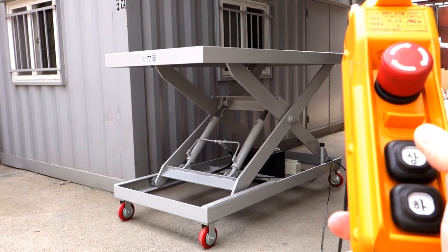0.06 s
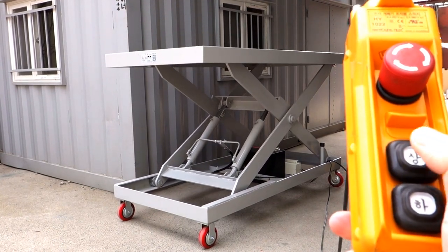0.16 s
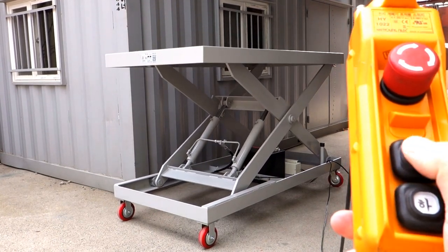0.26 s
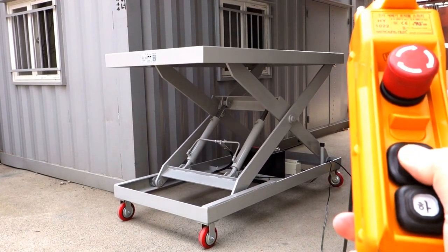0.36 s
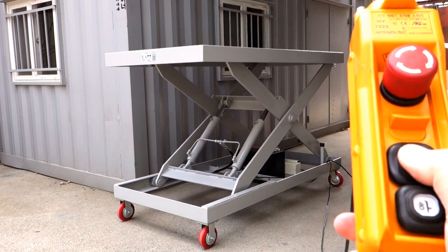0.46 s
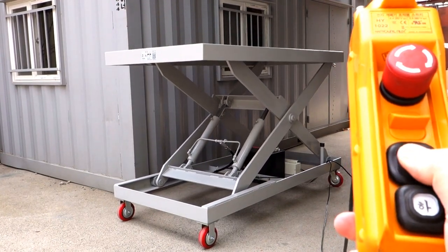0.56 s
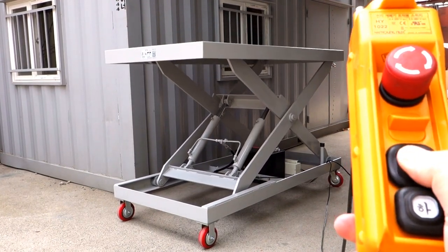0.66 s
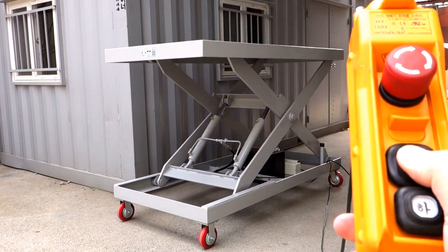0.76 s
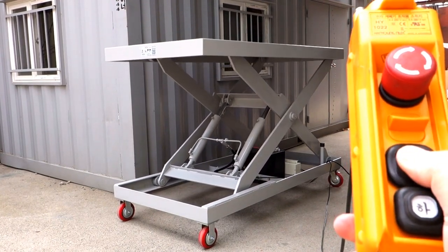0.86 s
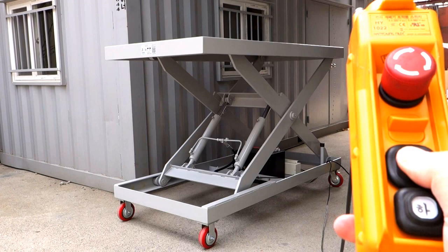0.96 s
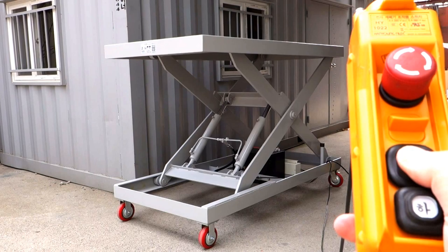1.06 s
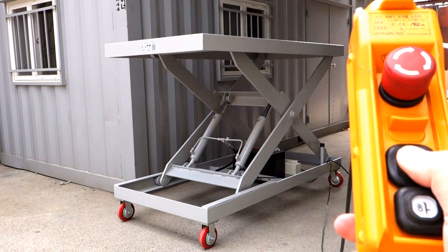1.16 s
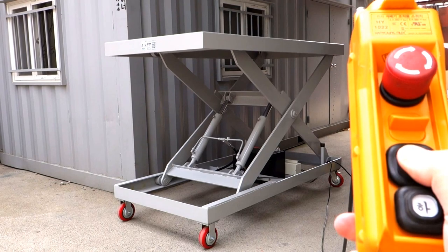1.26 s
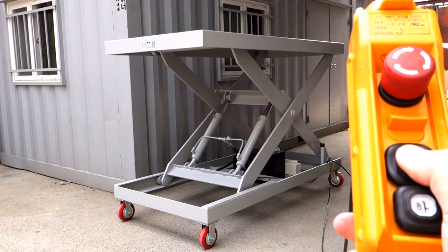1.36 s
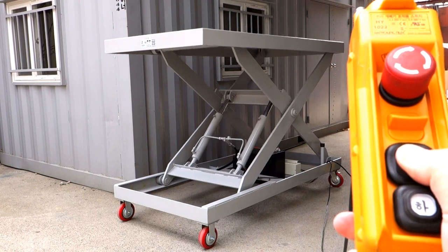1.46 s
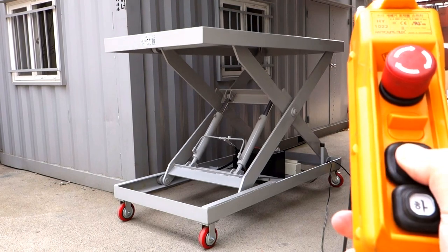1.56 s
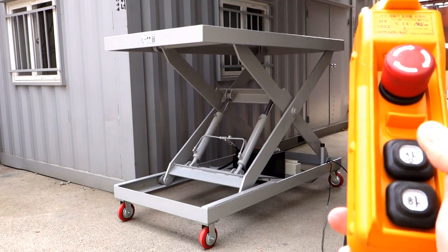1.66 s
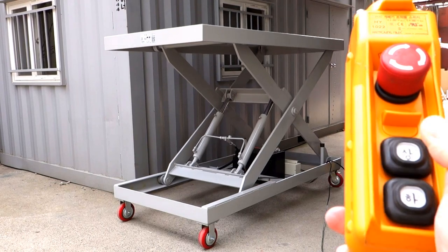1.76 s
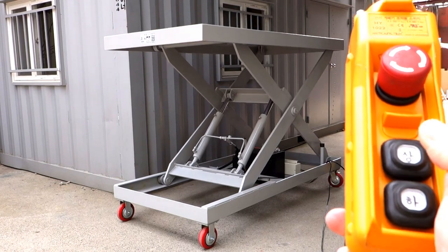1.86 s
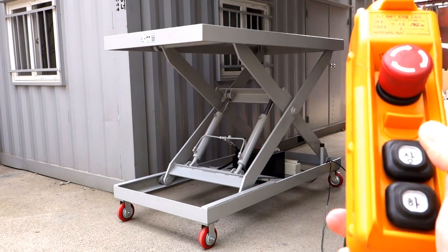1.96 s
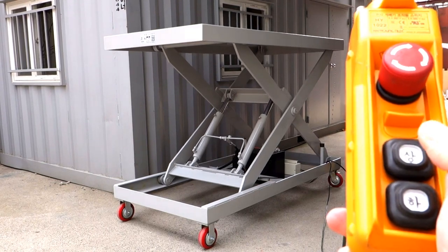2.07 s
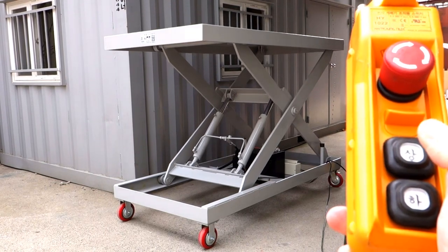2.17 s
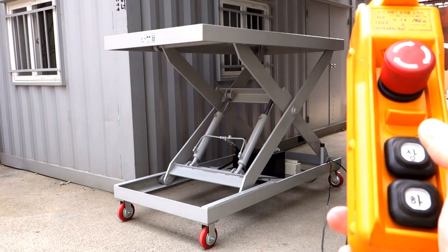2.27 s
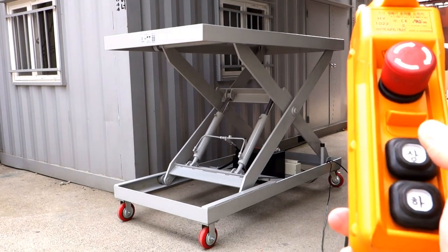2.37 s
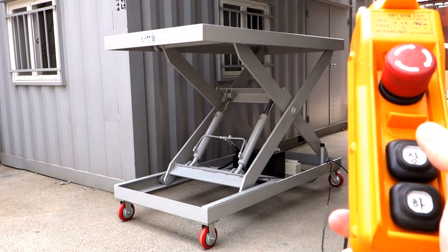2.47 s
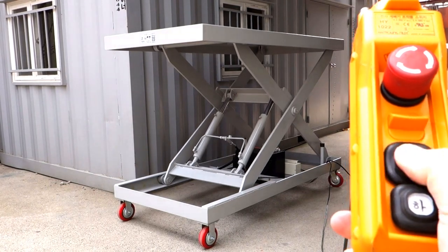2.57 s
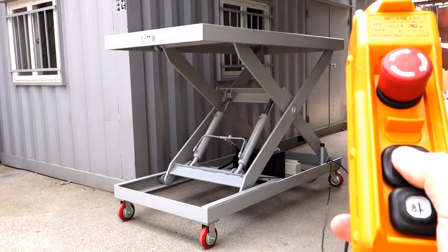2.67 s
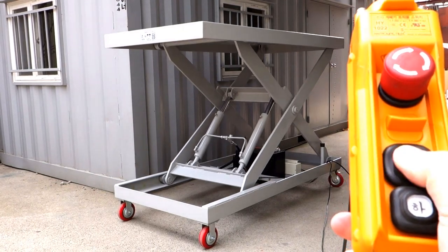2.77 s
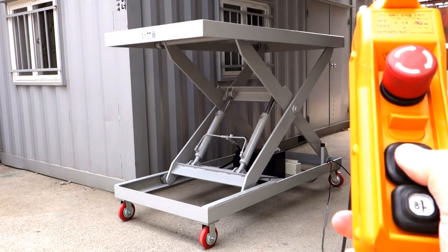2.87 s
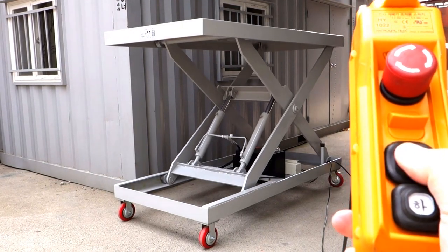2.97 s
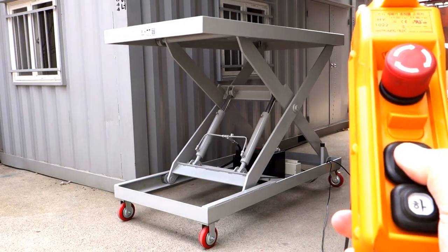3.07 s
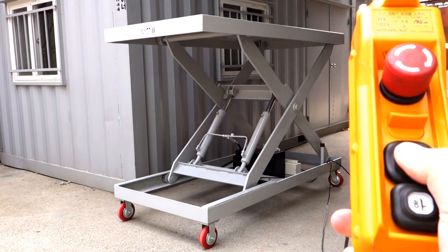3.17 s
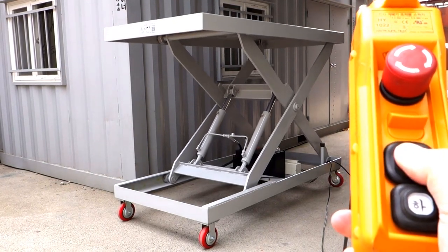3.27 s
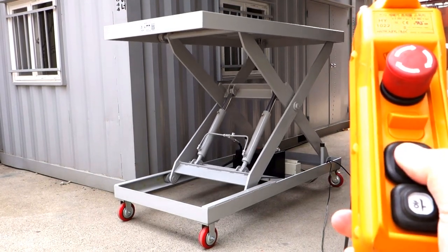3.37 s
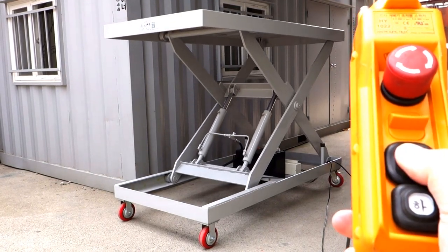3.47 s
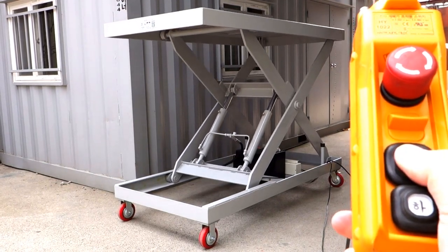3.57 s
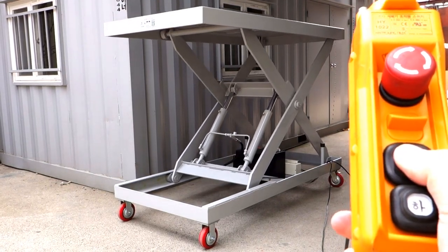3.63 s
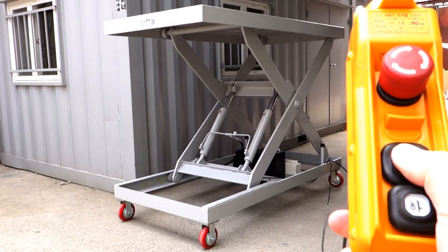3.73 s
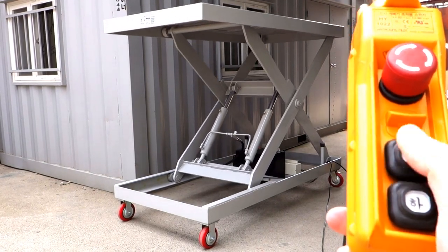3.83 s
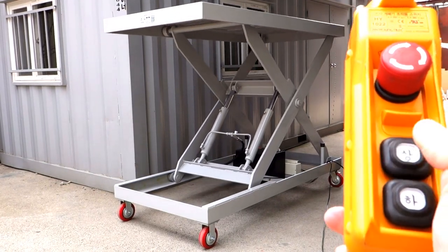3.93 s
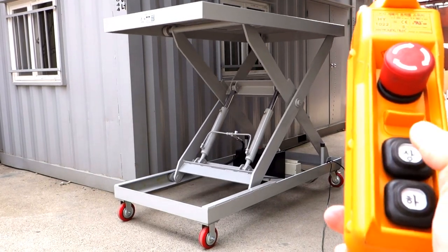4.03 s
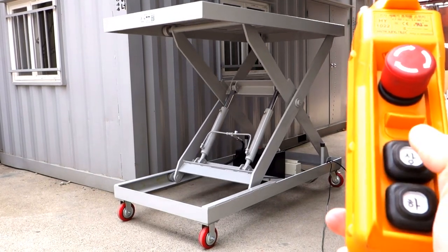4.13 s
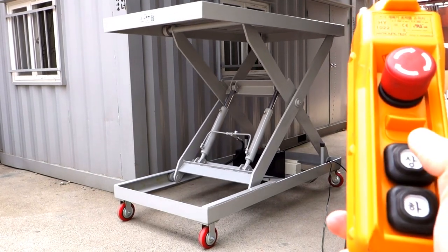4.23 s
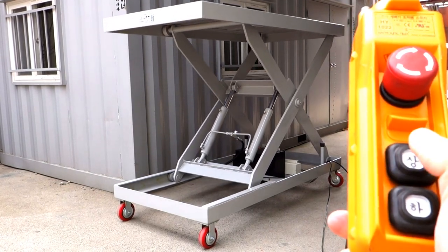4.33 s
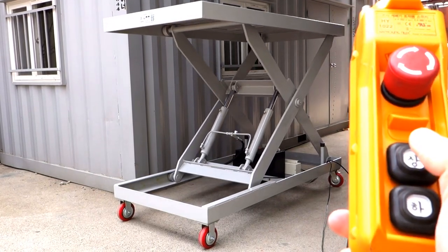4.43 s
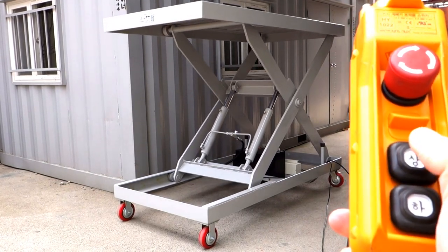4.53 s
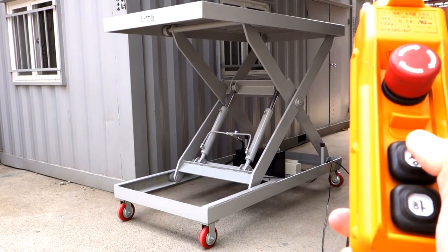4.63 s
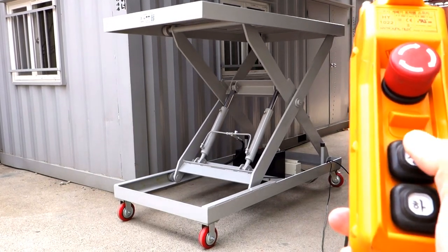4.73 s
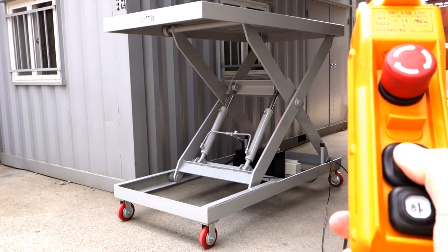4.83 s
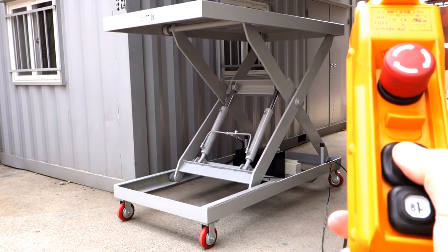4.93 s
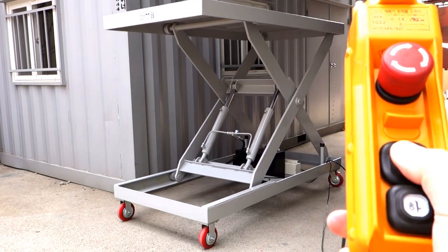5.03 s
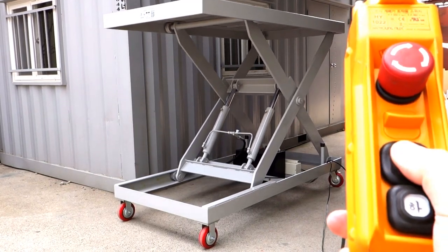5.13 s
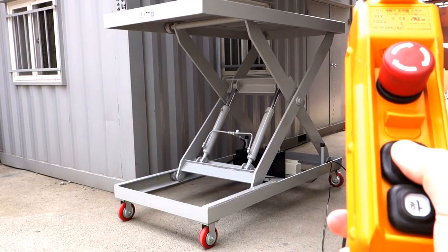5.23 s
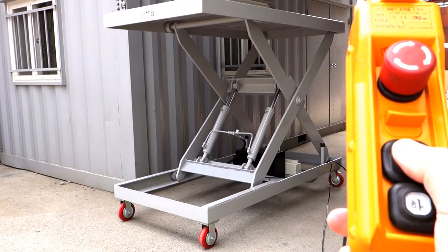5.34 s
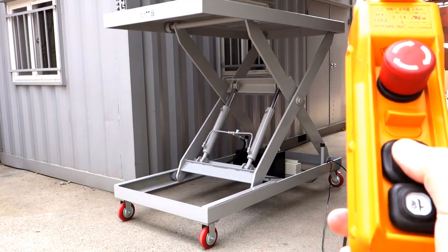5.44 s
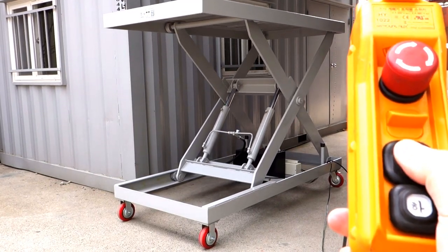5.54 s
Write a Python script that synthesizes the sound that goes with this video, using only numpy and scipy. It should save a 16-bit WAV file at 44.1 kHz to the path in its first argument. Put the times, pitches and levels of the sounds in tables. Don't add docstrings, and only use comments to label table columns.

```python
import sys
import numpy as np
from scipy import signal
from scipy.fft import rfft, irfft, next_fast_len
from scipy.io import wavfile
from scipy.ndimage import uniform_filter1d

SR = 44100
rng = np.random.default_rng(int(sys.argv[2]) if len(sys.argv) > 2 else 0)


def persist_wave(psi):
    counts = np.round(np.clip(psi, -1, 1) * 32767).astype(np.int16)
    wavfile.write(sys.argv[1], SR, np.atleast_2d(counts).T)


def linear_from_db(decibels):
    return 10 ** (np.asarray(decibels, float) / 20)


N = 246959
T = np.arange(N) / SR

SHAFT_HZ, TEETH, MAINS_HZ = 29.7225, 9, 60.0
# frequency in Hz, level in dB per Hz.
OIL_SPECTRUM = [(530, -59), (900, 0.5), (1150, -21.5), (1510, -5), (1600, -16), (2040, -12.5), (2660, -8.5),
                (2890, -11), (4300, -19.5), (5450, -25), (6000, -20.5), (10400, -16.5), (12600, -23),
                (14700, -26), (15400, -35), (16000, -52)]


def evened(x):
    return x / np.sqrt(np.mean(x ** 2) + 1e-20)


def read(points, hz):
    f, value = np.transpose(points)
    return np.interp(np.log(hz + 1), np.log(f + 1), value)


def fade(points):
    return linear_from_db(np.interp(T, *np.transpose(points)))


def colour(x, points):
    log_gain = np.log(linear_from_db(np.maximum(read(points, abs(np.fft.fftfreq(4096, 1 / SR))), -100)))
    taps = np.fft.ifft(np.exp(np.conj(signal.hilbert(log_gain)))).real[:2048]
    return signal.oaconvolve(x, taps)[:len(x)]


def ring(x, modes):
    out = np.zeros(len(x))
    for hz, width, db in modes:
        r = np.exp(-np.pi * width / SR)
        pole = r * np.exp(2j * np.pi * hz / SR)
        out += linear_from_db(db) * 2 * signal.lfilter([1 - r], [1, -pole], x).real
    return out


def drift(hz):
    t = T[::128]
    waves = [np.sin(2 * np.pi * (f * t + rng.random())) / np.sqrt(f) for f in np.geomspace(hz / 10, hz, 12)]
    return np.interp(T, t, evened(sum(waves)))


def tone(cycles):
    return np.cos(2 * np.pi * cycles)


def ports(x, side, lag, spread_s):
    # frequency in Hz, likeness from 0 to 1.
    likeness = [(100, 1), (300, 0.98), (640, 0.95), (1400, 0.75), (3100, 0.49), (5200, 0.08), (7000, 0.29),
                (15000, 0.36)]
    size = next_fast_len(N + SR // 2)
    hz = np.fft.rfftfreq(size, 1 / SR)
    hops = np.exp(-2j * np.pi * hz * spread_s * rng.uniform(.2, 1, (6, 1)))
    near = np.prod((hops - .5) / (1 - .5 * hops), 0)
    same = np.clip(read(likeness, hz), 0, 1)
    short = np.minimum(hz / 350, 1)
    mid = np.sqrt((1 + same) / 2)
    rest = np.sqrt((1 - same) / 2) * near * short
    lag_hz = lag / (1 + (hz / 6300) ** 6)
    tilt = linear_from_db(read(side, hz) / 2 * short) * np.exp(-1j * np.pi * hz * lag_hz / SR)
    pair = np.array([(mid + rest) * tilt, (mid - rest) / tilt])
    return irfft(rfft(x, size) * pair, size)[:, :N]


def far_wash():
    # frequency in Hz, level in dB per Hz.
    spectrum = [(18, -38), (32, -10), (60, -1.5), (119, -15), (162, -9), (265, -10.5), (450, -15.5),
                (800, -20), (1500, -25), (2500, -31.5), (4000, -40.5), (6500, -54), (10000, -63),
                (16000, -83)]
    # time in seconds, level in dB.
    levels = [(0, -38), (.35, -37), (1.2, -35.5), (2.0, -33), (2.5, -33.5), (3.3, -35.5), (4.2, -34.5),
              (4.8, -35), (5.6, -34)]
    hz, t, z = signal.stft(rng.standard_normal(N), SR, nperseg=1024, noverlap=768)
    patches = uniform_filter1d(rng.standard_normal(z.shape), 8, 0)
    patches = evened(uniform_filter1d(patches, 14, 1))
    z = z * linear_from_db(read(spectrum, hz)[:, None] + 0.58 * patches)
    return evened(signal.istft(z, SR, nperseg=1024, noverlap=768)[1][:N]) * fade(levels)


def far_rumble():
    # time of the crest in seconds, level in dB.
    swells = [(.11, -30.5), (1.1, -29), (2.99, -21), (4.04, -32), (4.35, -29), (5.14, -23), (5.52, -31)]
    low = ring(rng.standard_normal(N), [(49.6, 5.3, 14), (67, 44, 5.6)])
    low = evened(colour(low, [(1500, 0), (8000, -30)]))
    level = linear_from_db(-43 + 4 * drift(3.1))
    for s, db in swells:
        level = level + linear_from_db(db) * np.exp(-abs(T - s) / 0.12)
    return low * level * linear_from_db(-15.0)


def far_drone():
    # frequency in Hz, width in Hz, gain in dB.
    modes = [(225, 5, -1), (447, 5, 0), (640, 40, -8), (694, 30, -7)]
    # time in seconds, level in dB.
    levels = [(1.6, -74), (1.86, -46), (1.93, -37), (2.15, -39), (2.28, -46), (2.45, -45), (2.6, -46),
              (3.0, -68)]
    return evened(ring(ring(rng.standard_normal(N), modes), modes)) * fade(levels)


def far_hoist():
    # time in seconds, frequency in Hz, level in dB.
    path = [(1.05, 385, -60), (1.18, 397, -45), (1.3, 414.7, -43), (1.4, 419.2, -38), (1.52, 420, -44),
            (1.63, 428.1, -47), (1.72, 436, -67)]
    s, hz, db = np.transpose(path)
    level = linear_from_db(np.interp(T, s, db, -120, -120) + drift(14))
    return np.sqrt(2) * level * tone(np.cumsum(np.interp(T, s, hz) + 2 * drift(14.9)) / SR)


def button():
    # time in seconds, peak in dB, bright centre in Hz, left minus right in dB, treble tilt in dB.
    clicks = [(0.3888, -19, 3870, -9, -2), (0.3995, -15, 7800, -6, -11), (0.404, -28, 3000, -5, -10),
              (1.6298, -18, 4400, -11, -7), (2.5734, -52, 3000, -3, 8), (2.5787, -23.5, 2870, -9, -23),
              (2.581, -26, 2900, -6, -25), (2.6036, -16, 5960, -9, 3), (2.6142, -14, 2300, -8, -10),
              (2.619, -21, 1900, -5, -18), (3.816, -27, 2660, -7, -5), (3.828, -17, 4580, -12, -6),
              (3.834, -25, 2670, -6, -9), (4.841, -31, 2980, -4.0, -29), (4.849, -13.5, 2100, -9, -7),
              (4.852, -14, 4000, -5, -6), (4.8563, -8, 3670, -8, -5)]
    # frequency in Hz, level in dB per Hz.
    plastic = [(710, -51), (1200, -2), (3290, 1), (3740, 1.5), (6030, -3), (6650, -11), (8170, -6),
               (9510, -5), (12300, -11), (16000, -33)]
    out, t = np.zeros((2, N)), T[:900]
    for s, db, hz, pan_db, tilt_db in clicks:
        decay = np.exp(-t / 0.00043) + 0.28 * np.exp(-t / 0.0028) + 0.045 * np.exp(-t / 0.0031)
        burst = rng.standard_normal(900) * np.minimum(t / 0.00053, 1) * decay
        burst = colour(burst, [(3000, 0.0025), (12000, tilt_db)])
        snap = evened(colour(burst, plastic)) + 0.88 * evened(ring(burst, [(hz, 900, 0)]))
        shaded = colour(snap, [(3000, 0), (12000, -3.5)])
        pan = linear_from_db(np.array([[pan_db / 2], [-pan_db / 2]]))
        at = round((s - .001) * SR)
        out[:, at:at + 900] += linear_from_db(db - 2.5) * np.array([shaded, snap]) / abs(snap).max() * pan
    return out


def yard(flat_s, rise_s):
    # frequency in Hz, time to die by 60 dB in seconds.
    die_s = [(200, 0.58), (1000, 0.65), (4000, 0.6), (12000, 0.45)]
    hz, t, z = signal.stft(rng.standard_normal(SR), SR, nperseg=256)
    z = z * linear_from_db(-60 * np.maximum(t - flat_s, 0) / read(die_s, hz)[:, None])
    tail = signal.istft(z, SR, nperseg=256)[1][:SR]
    return tail * np.minimum(T[:SR] / rise_s, 1)


def knocks(rows, body, ring_db, flat_s, rise_s, chatter):
    # frequency in Hz, width in Hz, gain in dB.
    box = [(385, 55, 14.5), (718, 32, -7), (1304, 100, 6.5), (2080, 20, 8), (2560, 45, 2), (3380, 82, 3)]
    landings_s = [.0012, .0044, .0076]
    out, t = np.zeros(N + SR), T[:SR]
    for s, db, bounce_s, yard_db, lift_db in rows:
        hits = rng.standard_normal(SR) * (rng.random(SR) < .6)
        hits = hits * np.exp(-t / bounce_s) * np.minimum(t / min(rise_s, bounce_s), 1)
        late = 1.5 * np.minimum(t / min(0.006, bounce_s), 1) * np.exp(-t / .018)
        lands = np.zeros(SR)
        lands[(np.array(landings_s) * SR).astype(int)] = chatter * np.sqrt(bounce_s / 0.045)
        thud = colour(hits + lands, [(1800, 2.5), (3500, -14)])
        rattle = colour(hits * late, [(1500, -25.5), (2500, 4.0), (9000, lift_db)])
        parts = []
        for x in (thud + rattle, yard(flat_s, 0.021)):
            parts.append(evened(evened(colour(x, body)) + linear_from_db(ring_db) * evened(ring(x, box))))
        blow, echoes = parts
        at = round(s * SR)
        out[at:at + SR] += linear_from_db(db) * np.sqrt(.03) * (blow + linear_from_db(yard_db) * echoes)
    return out[:N]


def contactor_pulls_in():
    # time in seconds, level in dB, bounce time in seconds, yard share in dB, treble lift in dB.
    rows = [(.409, -32.5, 0.0019, -14, 4), (.4125, -25, 0.0071, -0.5, 4.5), (2.626, -30, 0.0025, -5, -4),
            (2.6295, -23.5, 0.0073, -2.5, 4.5), (4.870, -31.5, 0.0033, -1, -11), (4.873, -24, 0.012, 0, 12),
            (4.893, -34.5, 0.001, -2, -1)]
    # frequency in Hz, level in dB per Hz.
    body = [(88, -78), (150, -10), (398, 3.5), (514, -8), (689, -5), (941, -13), (1260, -5), (1500, -8),
            (1830, -7.5), (2060, -8.5), (2600, -10.5), (6640, -25), (9260, -27.5), (16000, -48)]
    return knocks(rows, body, -13.5, 0.1, 0.0083, 0)


def contacts_part():
    # time in seconds, level in dB, bounce time in seconds, yard share in dB, treble lift in dB.
    rows = [(1.651, -33, 0.0031, -15, 0), (3.848, -31, 0.0067, -22, 0), (5.083, -32.5, 0.012, -4, 0)]
    # frequency in Hz, level in dB per Hz.
    body = [(300, -28), (900, -3), (1700, -7), (3200, 5), (4300, -4), (8000, -35), (16000, -43)]
    return knocks(rows, body, -14.0, 0.05, 0.0015, 0)


def contactor_drops_out():
    # time in seconds, level in dB, bounce time in seconds, yard share in dB, treble lift in dB.
    rows = [
        (1.6562, -17, 0.016, 0.51, 7.6),
        (3.8552, -18, 0.018, 1, 10.4),
        (5.0902, -17, 0.02, 0.12, 7.4),
    ]
    # frequency in Hz, level in dB per Hz.
    body = [(88, -55), (150, -15), (244, -1), (422, -4.5), (524, -1), (1140, -1.5), (1340, 0.5), (1530, -6),
            (1980, -1), (3550, -14.5), (4950, -23.5), (10800, -29.5), (14000, -33.5), (16000, -52)]
    return knocks(rows, body, -7.5, 0.042, 0.0015, 8.5)


def jolts():
    # time in seconds, frequency in Hz, level in dB, time to die by 60 dB in s.
    panels = [(.4105, 313, -12.5, 0.064), (.418, 1800, -15, 0.058), (.425, 644, -21.5, 0.27),
              (1.657, 385, -30, 0.4), (1.658, 1100, -18, 0.071), (1.661, 1330, -21, 0.18),
              (2.628, 3280, -23.5, 0.1), (2.624, 370, -19.5, 0.071), (2.9, 270, -24, 0.12),
              (2.629, 1835, -16, 0.091), (2.63, 698, -23.5, 0.19), (3.862, 400, -21.5, 0.26),
              (3.857, 707, -19, 0.13), (3.862, 1266, -22, 0.3), (5.092, 1307, -23, 0.28),
              (4.873, 385, -12.5, 0.14), (4.875, 272.5, -17.5, 0.21), (4.875, 1220, -19, 0.073),
              (5.09, 283.4, -22.5, 0.31)]
    # time in seconds, frequency in Hz, level in dB.
    frame_parts = [(.455, 668, -27.5), (.509, 990, -25), (0.559, 151, -33.5), (.57, 295, -22),
                   (.588, 552, -32), (.59, 1233, -33), (.612, 288, -24), (.647, 295, -24), (.685, 552, -29),
                   (.71, 637, -24), (.72, 1023, -31), (0.864, 1183, -36), (.88, 566, -30),
                   (1.674, 262.6, -20), (3.905, 560, -29), (1.818, 316, -31), (2.729, 1000, -26.5),
                   (2.745, 1220, -33), (2.776, 295, -21), (2.802, 110, -28), (2.78, 587, -29),
                   (2.81, 314, -20.5), (2.87, 285, -24), (4.981, 1077, -27), (5.003, 296, -18),
                   (5.045, 295, -20), (5.201, 253.5, -27)]
    rows = list(panels)
    for s, hz, db in frame_parts:
        rows.append((s, hz, db, 0.24 * (300 / hz) ** 0.42))
    out, t = np.zeros(N), T[:SR // 4]
    for s, hz, db, t60 in rows:
        wobble = 1 + 0.0347 * evened(uniform_filter1d(rng.standard_normal(len(t)), 500))
        swing = np.sin(2 * np.pi * np.cumsum(hz * wobble) / SR)
        at = round(s * SR)
        out[at:at + len(t)] += linear_from_db(db + 2.5 - 60 * t / t60) * np.minimum(t / 0.0071, 1) * swing
    return out


def frame_judder():
    # time of the surge in seconds, level in dB.
    breaks = [(.46, -28.5), (.53, -29), (.59, -24), (.70, -23.5), (.88, -32.5), (2.66, -29), (2.79, -26.5),
              (3.71, -49), (3.81, -47), (4.9, -24), (4.98, -29.5)]
    # frequency in Hz, width in Hz, gain in dB.
    frame = [(110, 19, -16), (195, 74, 0), (295, 47, 6.5), (352, 95, -7), (385, 35, 0), (396, 5.3, -16),
             (560, 72, -2), (634, 41, 4), (1000, 82, -4), (1250, 73, -19)]
    power = linear_from_db(2 * -37.5)
    for s, db in breaks:
        away = np.where(T < s, (s - T) / 0.023, (T - s) / 0.093)
        power = power + linear_from_db(2 * db) * np.exp(-2 * away)
    slips = linear_from_db(4.25 * np.minimum(rng.exponential(1, N), 4))
    slips = slips * (rng.random(N) < 1500 / SR) * rng.choice([-1, 1], N)
    return np.sqrt(power) * evened(ring(ring(slips, frame), [(493, 4100, 0)]))


def oil_hiss():
    # frequency in Hz, width in Hz, gain in dB.
    jets = [(8230, 200, -1), (8980, 200, -2), (9480, 120, -4), (10150, 350, 1.5), (10850, 180, -2),
            (11600, 150, -5), (12300, 300, -2), (13480, 300, -4), (14050, 150, -3)]
    oil = colour(rng.standard_normal(N), OIL_SPECTRUM)
    return evened(oil + ring(oil, jets))


def mains_hum():
    # multiple of the mains frequency, level in dB.
    lines = [(2, -54), (4, -33), (6, -55)]
    return sum(linear_from_db(db) * tone(k * MAINS_HZ * T + rng.random()) for k, db in lines)


def turn_wave(levels_db, turns):
    z = np.zeros(8193, complex)
    z[1:len(levels_db) + 1] = linear_from_db(levels_db) * np.exp(2j * np.pi * rng.random(len(levels_db)))
    wave = irfft(z)
    return np.interp(turns % 1 * 16384, np.arange(16385), np.append(wave, wave[0])) * 8192 * np.sqrt(2)


def turn_flaws(turns, worn):
    # frequency in Hz, gain in dB.
    casing = [(1700, 8), (2600, 8), (3400, 9), (4200, 4), (5600, 3), (8000, 1), (12000, -2)]
    orders = np.arange(1, 531)
    listed = (orders % TEETH == 0) | np.isin(orders, [k for k, db in worn])
    hz = orders * SHAFT_HZ
    levels_db = read(OIL_SPECTRUM, hz) + read(casing, hz) + 4 * rng.standard_normal(530) - 30 * listed
    return evened(turn_wave(levels_db, turns))


def high_whine(turns, first_run):
    # multiple of the tooth tone, dB in the first run, dB in later runs.
    high = [(17, -73, -67), (18, -74, -74), (19, -73, -70), (20, -76, -76), (21, -71, -65), (22, -66, -69),
            (23, -72, -72), (24, -69, -68), (26, -66, -70), (27, -72, -73), (31, -71, -69), (33, -65, -67),
            (34, -69, -74), (38.11, -62, -67)]
    # multiple, dB in the first run, dB in later runs.
    above = [(7, -66, -69), (8, -64, -62), (9, -71, -67), (11, -67, -72), (24, -70, -71), (26, -71, -79),
             (28, -70, -72), (30, -66, -74), (33, -69, -69), (35, -72, -69), (37, -62, -68), (41, -68, -72),
             (45, -75, -73), (50, -69, -70)]
    # multiple, dB in the first run, dB in later runs.
    below = [(17, -72, -73), (19, -79, -76), (22, -77, -78), (24, -69, -72), (31, -67, -73), (32, -73, -69),
             (35, -72, -80), (39, -73, -72), (40, -74, -69), (41, -68, -69), (44, -70, -75), (50, -71, -74),
             (52, -68, -69), (54, -84, -76)]
    out, pull = np.zeros(N), 2 * MAINS_HZ * T
    for lines, side in ((high, 0), (above, 1), (below, -1)):
        for k, first_db, later_db in lines:
            level = linear_from_db((first_db if first_run else later_db) + 2 * drift(10.0))
            waver = k / 45 * drift(40) / (2 * np.pi)
            out += level * tone(k * TEETH * turns + side * pull + rng.random() + waver)
    return out


def tooth_db(on, off, db, climb, bounce_db, crest_s, coast):
    since = np.clip(T - on, 0, off - on)
    sway = bounce_db * np.exp(-abs(T - crest_s) / 0.98) * tone(6.8 * (T - crest_s))
    return db + climb * since + sway - coast * np.maximum(T - off - 0.0089, 0)


def pump():
    # on in seconds, off in seconds.
    spans = [
        (0.413, 1.657),
        (2.626, 3.857),
        (4.874, 5.09),
    ]
    # level in dB, climb in dB per s, platform bounce in dB,
    # bounce crest in seconds, fall while coasting in dB per s.
    tooth_tones = [(-27, -2.5, 4, 0.731, 93), (-29, 3.5, -0.5, 3.3, 71), (-27, -16, 3, 5.0, 49)]
    beat_lead = [.45, .47, 0]
    # time in seconds, level in dB.
    fourths = [
        [(.47, -63), (.66, -37.5), (.77, -42.5), (1.04, -38), (1.62, -37)],
        [(2.67, -46), (2.92, -42.5), (3.2, -45.5), (3.5, -53), (3.68, -40.5), (3.82, -41.5)],
        [(4.91, -42), (4.98, -31), (5.06, -35.5)],
    ]
    # multiple, level in dB, climb in dB per s, sag at mid-run in dB.
    mesh_runs = [
        [(2, -39.5, -4, -1), (3, -46, -6, 0), (5, -50, -8, 9), (6, -51.5, -3, -4), (7, -55, 8, 4),
         (8, -53.5, -8, -0.5), (9, -51, 4, 11), (10, -52.5, 5, 9), (11, -51.5, -4, 7), (12, -57, 1, 0),
         (13, -59, 2, 3), (14, -58.5, -1, 6), (15, -64, -9, 0)],
        [(2, -40, 1, -1), (3, -70, -1, 4), (5, -53, 9, 1), (6, -48.5, 3.5, 0), (7, -54, 2, 4), (8, -57, -2, 5),
         (9, -56.5, -2, -2), (10, -52, 0, 2), (11, -61, -10, -6), (12, -59.5, -5, 0), (13, -56, 2, 7),
         (14, -67, -5, -9), (15, -69, 5, -5)],
    ]
    # multiple of the shaft speed, level in dB.
    worn = [(60, -61), (65, -61), (68, -62), (82, -60), (83, -61), (89, -54.5), (91, -60), (98, -61),
            (149, -73), (167, -71)]
    out = np.zeros(N)
    unsteady = 1 + 0.0002 * drift(6)
    oil, judder = oil_hiss(), frame_judder()
    for settings, lead, fourth, (on, off), mesh in zip(
            tooth_tones, beat_lead, fourths, spans, mesh_runs + mesh_runs[-1:]):
        speed = 1 - .9 * np.exp(-np.maximum(T - on, 0) / .041)
        turns = np.cumsum(SHAFT_HZ * speed * unsteady) / SR
        live = np.interp(T, [on + 0.024, on + 0.22, off + 0.30, off + 0.35], [0, 1, 1, 0])
        powered = np.interp(T, [on, on + 0.018, off, off + 0.059], [0, 1, 1, 0])
        loaded = np.interp(T, [on + 0.11, on + 0.23, off, off + 0.095], [0, 1, 1, 0])
        settled = np.interp(T, [on + 0.033, on + 0.4, off, off + 0.028], [0, 1, 1, 0])

        teeth = linear_from_db(tooth_db(on, off, *settings)) * live * tone(TEETH * turns + lead + .22 * (T - on))
        teeth += fade(fourth) * loaded * tone(4 * TEETH * turns)
        for k, db in worn:
            teeth += loaded * linear_from_db(db + drift(2.0)) * tone(k * turns + rng.random())
        risen = np.clip(T - on, .2, 1.2) - .7
        for k, db, climb, sag_db in mesh:
            waver_db = (.5 + .05 * k) * drift(2.1)
            level_db = db + climb * risen - sag_db * np.cos(np.pi * risen) ** 2 + waver_db
            gate = loaded if k < 7 else settled
            teeth += linear_from_db(level_db) * gate * tone(round(k) * TEETH * turns + rng.random())

        throb = 1 + 0.21 * tone(turns) + .12 * tone(14 * turns)
        rush_db = np.interp(T - on, [0, .19, .38], [-52, -47.3, -49.7])
        hiss = linear_from_db(-2.0) * powered * throb * oil
        flaws = linear_from_db(-4.5) * settled * turn_flaws(turns, worn)
        whine = 1.95 * high_whine(turns, on < 1) * settled
        out += np.sqrt(2) * (teeth + mains_hum() * powered + whine)
        out += linear_from_db(rush_db + 6.0) * (hiss + flaws) + linear_from_db(-2.5) * powered * judder
    return out


def scene():
    # frequency in Hz, left minus right in dB.
    far_side = [(400, 0), (950, 2), (2400, 2), (9000, -1)]
    # frequency in Hz, left minus right in dB.
    lift_side = [(300, 0), (700, -2), (1500, -4), (4400, -3), (8000, -0.5), (15000, -9)]
    distance = far_wash() + far_rumble() + far_drone() + far_hoist()
    lift = pump() + jolts() + contactor_pulls_in() + contacts_part() + contactor_drops_out()
    return ports(distance, far_side, 2.1, 0.05) + button() + ports(lift, lift_side, 1.22, 0.0037)


def band_limit(x):
    return signal.sosfilt(signal.butter(12, 16510, fs=SR, output="sos"), x)


def record(dry):
    band = signal.butter(4, 36, "high", fs=SR, output="sos")
    top = signal.firwin(511, 15800, window=("kaiser", 8), fs=SR)
    ceiling = .75
    rounded = ceiling * np.tanh(signal.sosfilt(band, dry) / ceiling)
    return band_limit(signal.oaconvolve(rounded, top[None], "same"))


dry = scene()
out = record(dry)
persist_wave(out)
```